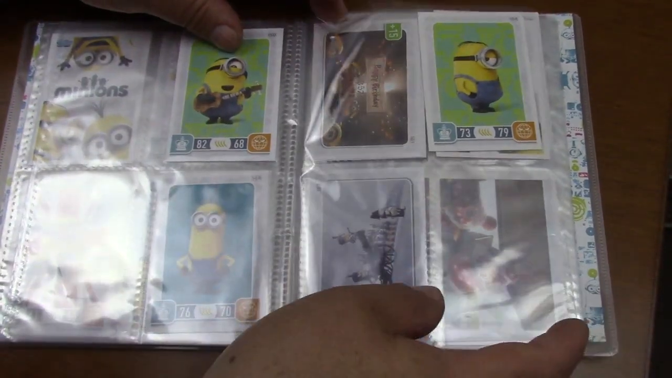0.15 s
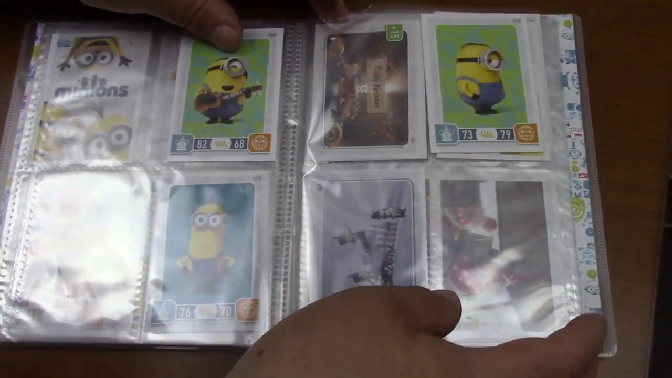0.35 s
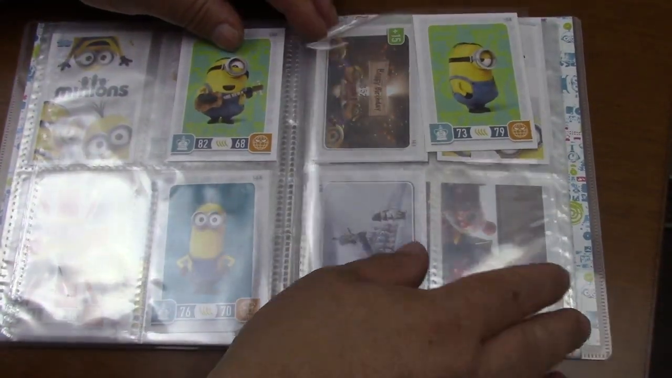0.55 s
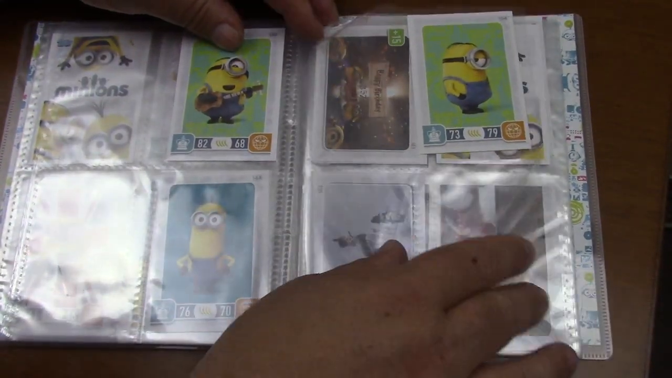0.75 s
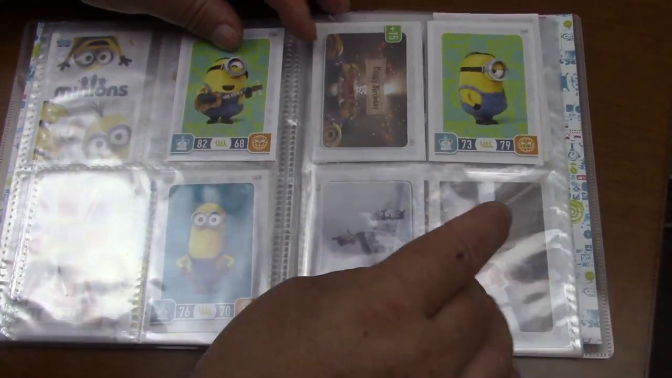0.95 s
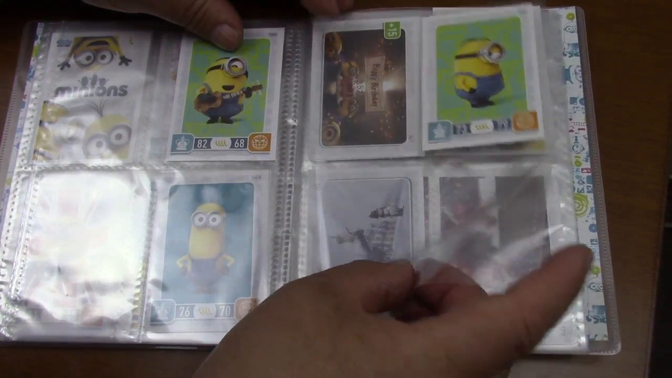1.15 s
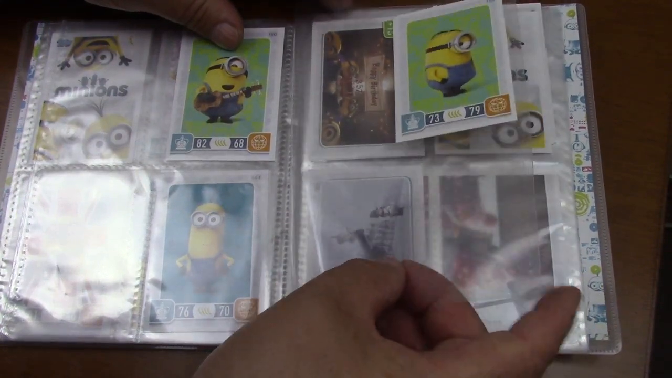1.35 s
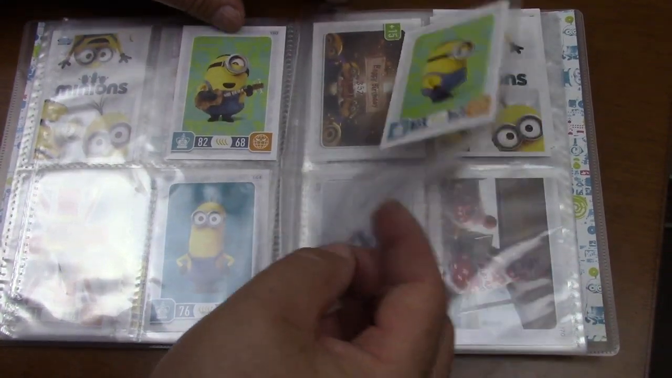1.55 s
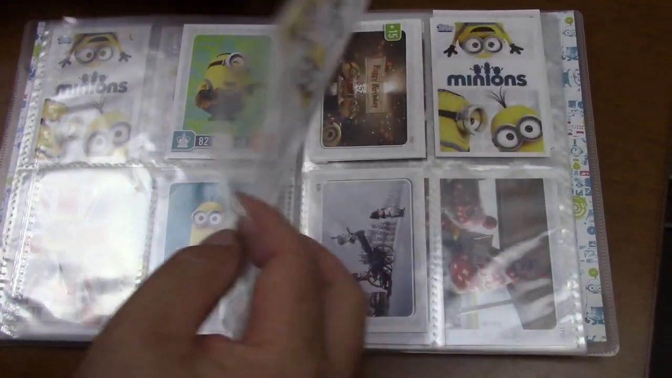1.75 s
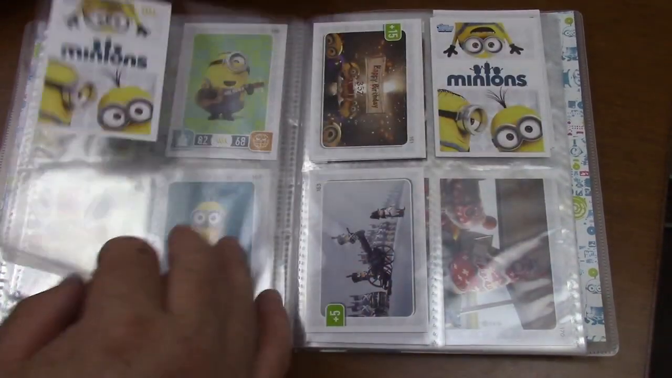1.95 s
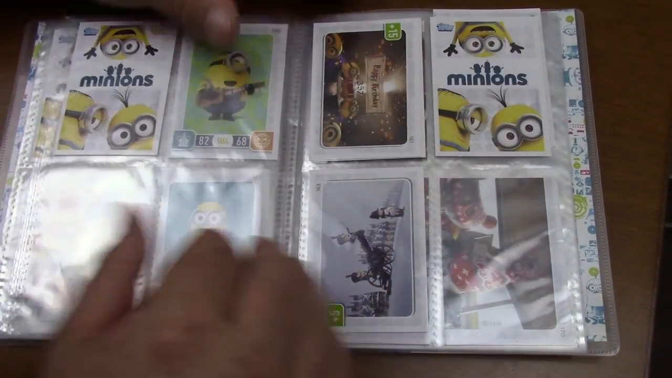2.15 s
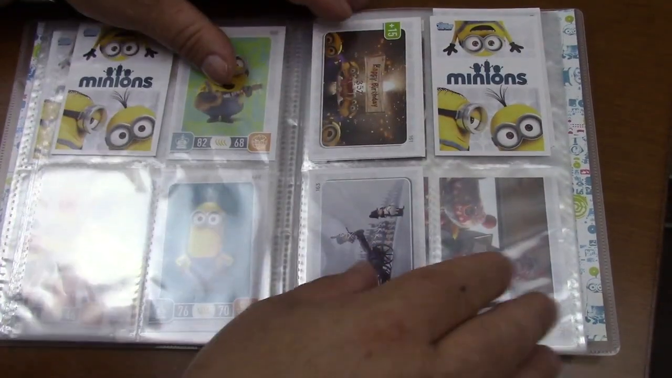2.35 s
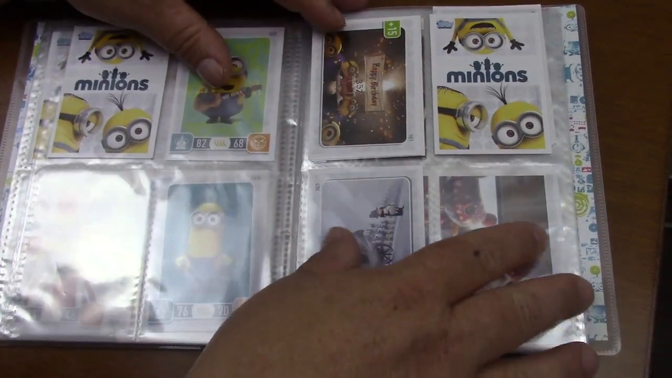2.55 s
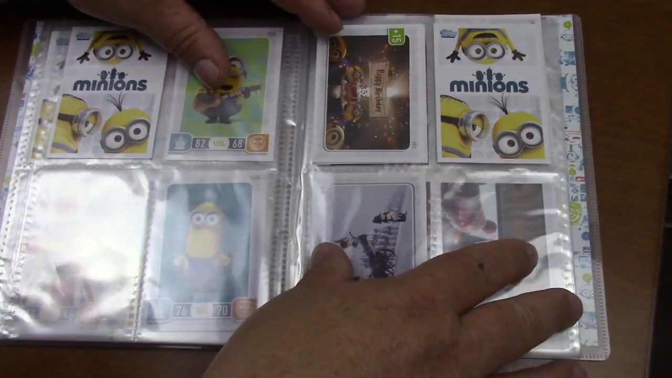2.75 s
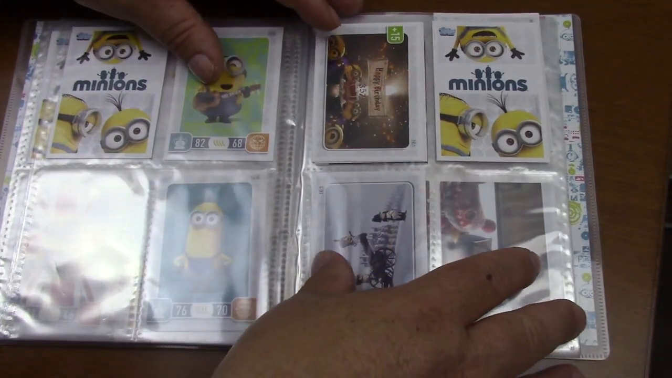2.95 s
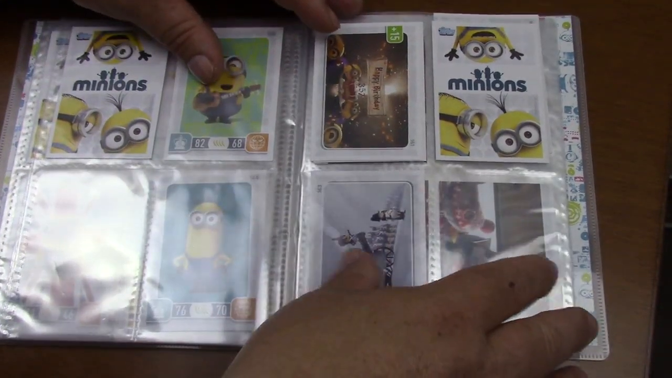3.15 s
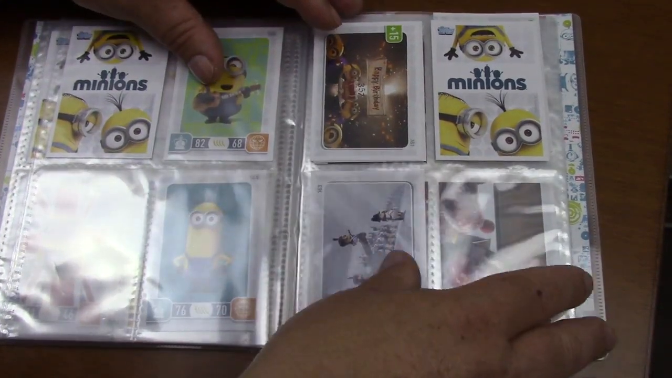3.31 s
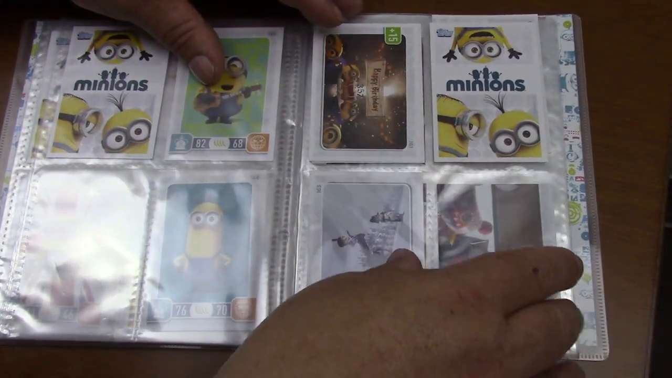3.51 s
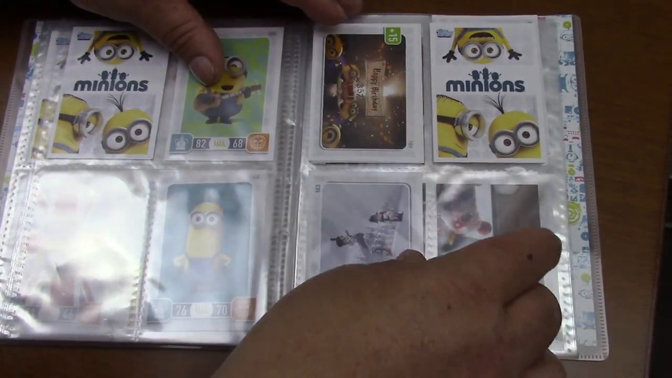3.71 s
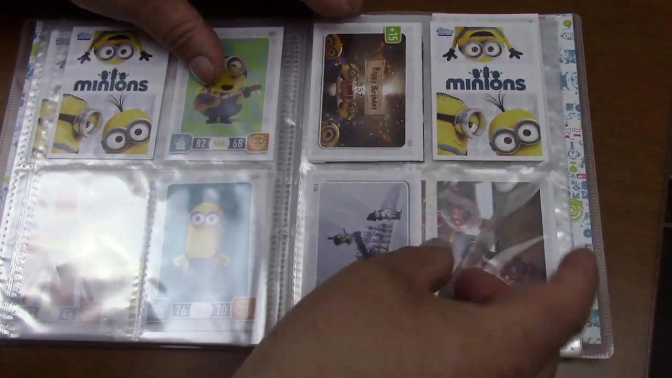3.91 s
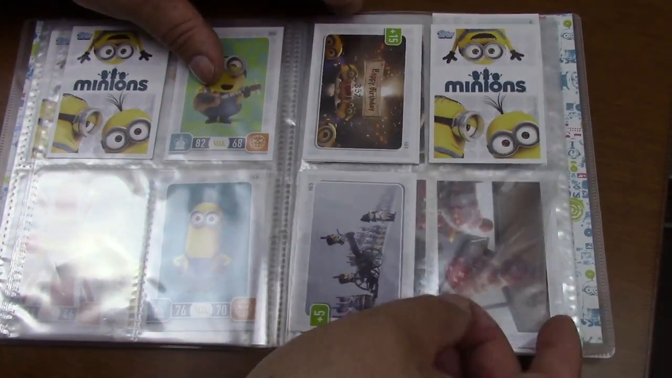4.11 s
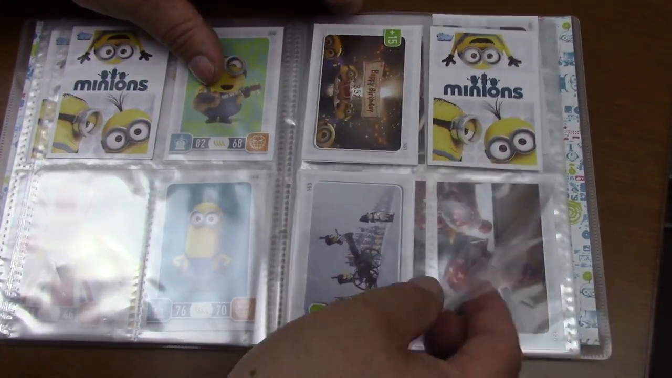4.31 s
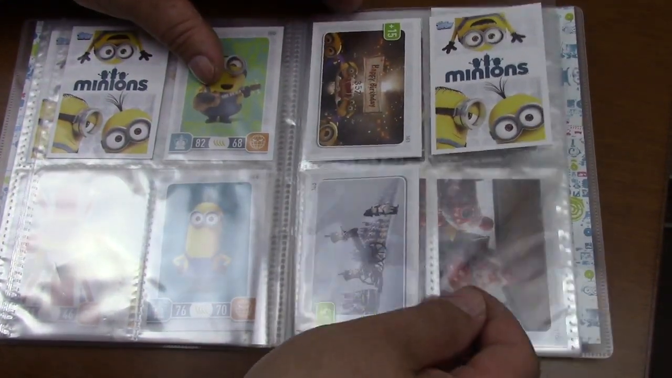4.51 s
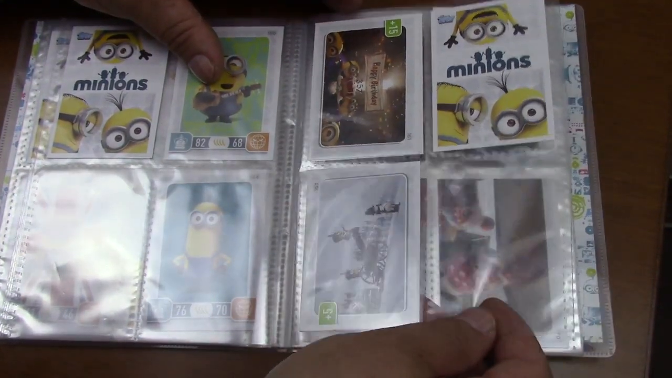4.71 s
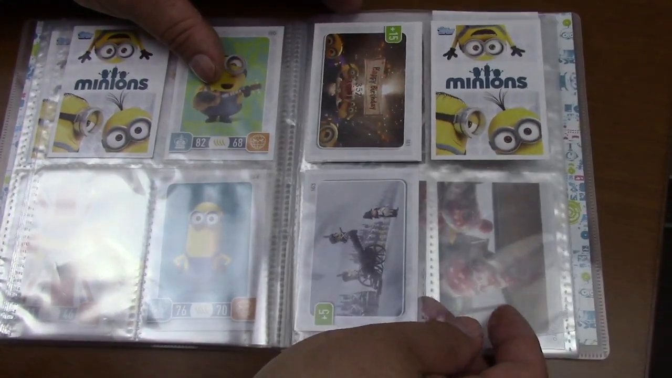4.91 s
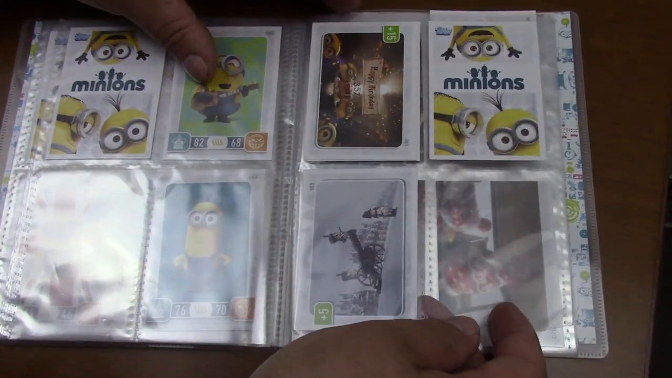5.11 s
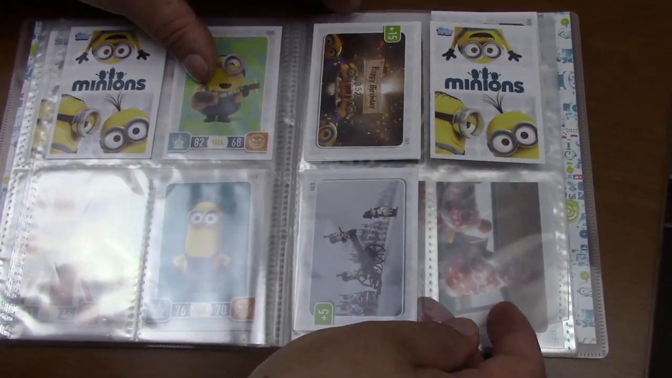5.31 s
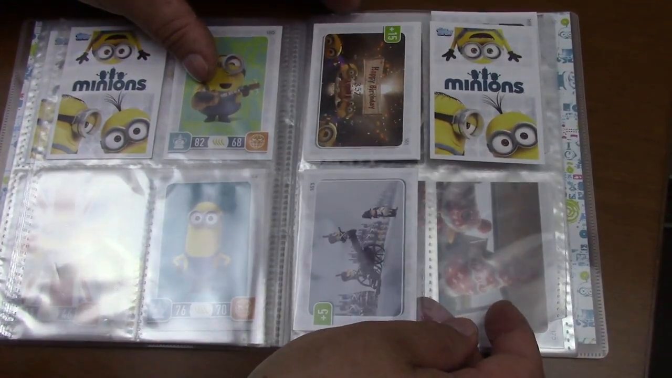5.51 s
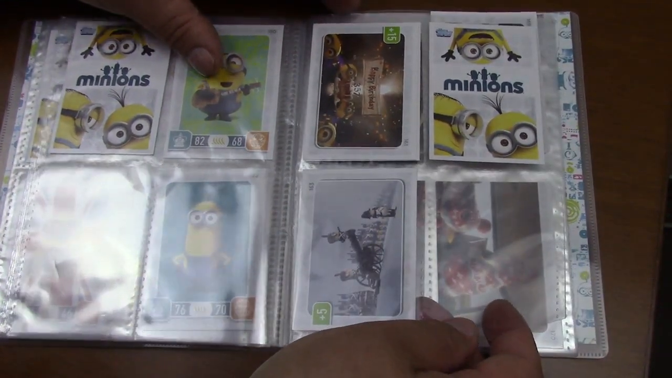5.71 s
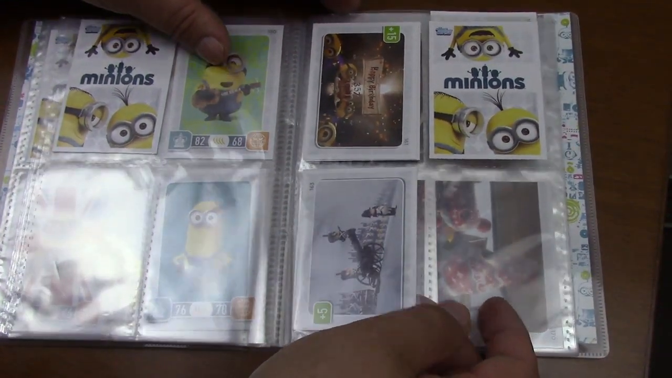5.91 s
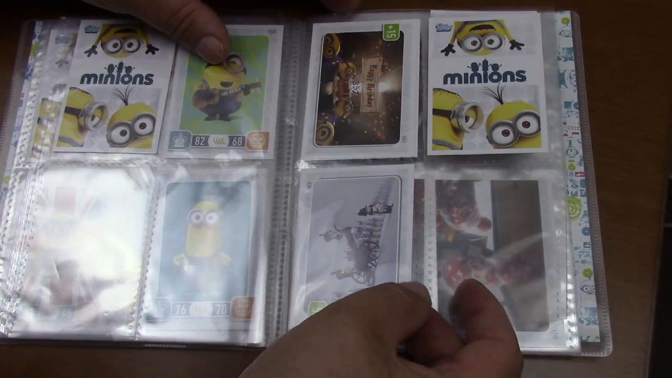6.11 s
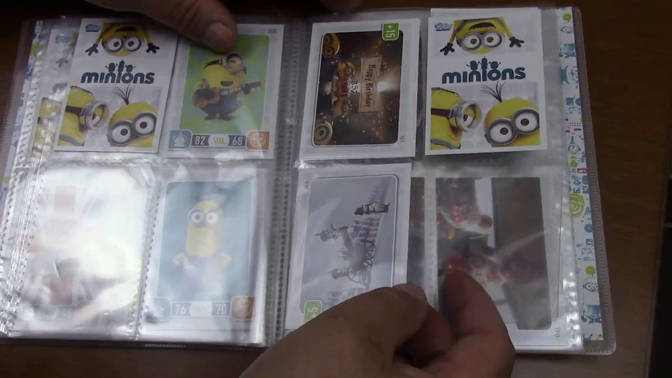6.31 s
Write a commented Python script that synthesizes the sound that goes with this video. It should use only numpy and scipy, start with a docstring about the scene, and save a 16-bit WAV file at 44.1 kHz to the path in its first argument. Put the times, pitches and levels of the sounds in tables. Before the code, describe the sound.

In a small, quiet room, fingers rub and slide over the clear plastic pockets of an album on a table, heard close up. The plastic buckles in short, crisp snaps, loudest near the start and busy while a page is turned. After a sparser stretch comes a second, softer run of rustling and crackling, which dwindles to light touches over faint room noise.

```python
"""Clear plastic pocket pages are turned and pressed on a wooden table in a small, quiet room.
Room air murmurs from the start. Fingers slide and rustle over the film, which buckles in short snaps,
loudest at 0.65 s and dense until 2 s; the walls answer. The handling thins out, picks up from 3.5 s,
then fades to faint strokes after 5.4 s. Heard at two closely spaced microphone ports."""
import sys
import numpy as np
from scipy import signal
from scipy.fft import rfft, irfft, next_fast_len
from scipy.io import wavfile
from scipy.ndimage import map_coordinates

SR = 44100
rng = np.random.default_rng(int(sys.argv[2]) if len(sys.argv) > 2 else 0)


def store_pcm(level_fs):
    """Save levels as 16-bit WAV."""
    pcm = np.round(np.clip(level_fs, -1, 1) * 32767).astype(np.int16)
    wavfile.write(sys.argv[1], SR, np.atleast_2d(pcm).T)


N = 280476

# Room noise spectrum: freq_hz, relative_density_db
AIR_SPECTRUM = [(24, -25), (40, -15), (91, -8.5), (237, -4.5), (337, -1.5), (529, -6), (663, -7),
                (965, -10.5), (1550, -15), (2320, -14), (2910, -18.5), (5720, -21), (7000, -25.5),
                (10000, -27.5), (16000, -34)]
# Narrow room murmurs: centre_hz, width_hz, level_db
AIR_MURMURS = [(131.3, 14, -76), (207, 38, -71)]
# Left-right likeness of the air: freq_hz, correlation
AIR_CORRELATION = [(30, 0.296), (130, 0.79), (640, 0.42), (3000, 0.62), (12000, 1)]
# Room decay: freq_hz, t60_s
WALL_DECAY = [(200, 0.88), (530, 0.62), (1400, 0.28), (3700, 0.26), (9700, 0.32), (16000, 0.34)]
# Part of the tail that differs between the ports: freq_hz, side_gain_db
WALL_SIDE_GAIN = [(250, -20.5), (700, -27), (2500, -25), (8000, -11.5), (15000, -23)]
# Broad resonances of the rubbed film, flex then rustle: centre_hz, width_hz
FILM_RESONANCES = [(1000, 840), (2900, 3000)]
# Surface hiss spectrum: freq_hz, relative_density_db
HISS_SPECTRUM = [(3000, 12), (6000, 6), (10000, 4), (13000, -3.5), (16000, 1)]
# Slow page handling: time_s, rustle_db, hiss_re_rustle_db
SLIDE_LEVELS = [(0.0, -62, 4.5), (0.26, -80, 17.5), (0.49, -60.5, -10), (0.65, -51, -6), (0.8, -48, -13),
                (0.96, -58.5, 4), (1.13, -52.5, 2), (1.5, -72, 0), (1.652, -56, -27), (2.0, -58.5, 11.5),
                (2.12, -49, -5), (2.22, -59, -4), (2.39, -70.5, 3.5), (3.37, -75.5, 5), (3.52, -59.5, -0.5),
                (4.07, -68, 4.5), (4.59, -70.5, 12.5), (5.49, -77, -1), (5.74, -69.5, 5), (6.36, -82, 16)]
# Finger strokes, quick crumples, soft cover bumps: start_s, length_s, level_db, centre_hz, spread_oct
FINGER_STROKES = [(0.145, 0.016, -41.5, 4200, 0.94), (0.429, 0.083, -55.5, 3950, 0.74),
                  (0.467, 0.0041, -50, 5000, 1.3), (0.53, 0.047, -53, 2240, 1.2),
                  (0.731, 0.21, -47, 9000, 0.53), (0.894, 0.01, -34.5, 2880, 0.37),
                  (0.91, 0.13, -53, 3320, 0.97), (0.95, 0.098, -60, 130, 0.17),
                  (1.054, 0.026, -31, 3200, 0.75), (1.08, 0.009, -36, 3000, 1.1),
                  (1.087, 0.045, -54, 3100, 1.1), (1.163, 0.068, -48.5, 3080, 1.04),
                  (1.233, 0.055, -46, 2600, 0.98), (1.285, 0.012, -38, 2630, 0.41),
                  (1.291, 0.0074, -43.5, 10000, 0.33), (1.45, 0.16, -48.5, 2470, 1.07),
                  (1.778, 0.0078, -31, 2420, 0.86), (1.917, 0.19, -52.5, 9000, 0.28),
                  (2.027, 0.011, -21.5, 3040, 0.93), (2.046, 0.0096, -36, 3160, 0.46),
                  (2.05, 0.13, -63, 125, 0.22), (2.25, 0.045, -49, 1070, 0.9),
                  (2.317, 0.045, -59, 9000, 0.88), (2.576, 0.12, -53.5, 1200, 0.98),
                  (2.66, 0.038, -45.5, 1700, 1.55), (3.118, 0.073, -62, 11000, 0.6),
                  (3.146, 0.2, -63, 10500, 0.55), (3.451, 0.054, -56.5, 8000, 0.3),
                  (3.47, 0.018, -48.5, 3670, 0.32), (3.482, 0.026, -52.5, 4100, 0.21),
                  (3.604, 0.0075, -48.5, 3980, 0.26), (3.642, 0.087, -59.5, 8000, 0.65),
                  (3.784, 0.076, -56.5, 3100, 0.95), (3.858, 0.079, -43.5, 6100, 0.88),
                  (3.896, 0.03, -38.5, 400, 0.88), (3.892, 0.0082, -29.5, 10000, 0.1),
                  (4.001, 0.014, -41, 5970, 0.83), (4.082, 0.068, -52, 8400, 0.75),
                  (4.189, 0.062, -55.5, 6700, 0.59), (4.249, 0.036, -44, 6000, 1.2),
                  (4.33, 0.14, -54, 5440, 0.85), (4.494, 0.041, -49.5, 2980, 1.3),
                  (4.67, 0.18, -58.5, 3280, 0.95), (5.177, 0.006, -52, 12500, 0.21),
                  (5.546, 0.15, -62, 2480, 0.56), (5.606, 0.11, -62, 1680, .07),
                  (5.779, 0.046, -56, 6100, .5), (6.062, 0.07, -63, 7300, 0.95)]
# Film buckling: start_s, ring_peak_db, pitch_hz, crackle_re_ring_db, crackle_hz, thud_re_ring_db
BUCKLING_SNAPS = [(0.026, -27.5, 4200, -5.5, 8000, -15.5), (0.107, -50, 1070, 19, 8200, -12),
                  (0.141, -37.5, 880, -4, 6000, -6.5), (0.194, -38.5, 885, 4, 10000, -7),
                  (0.211, -33.5, 1980, 9, 7700, -40), (0.501, -23.5, 3130, -19, 7000, -18),
                  (0.55, -40, 760, -8, 7000, 0.5), (0.596, -28.5, 3400, -25, 6000, -16),
                  (0.621, -23.5, 2750, -11, 6500, -30), (0.651, 0, 2610, -3, 9550, -37),
                  (0.654, -16.5, 2600, 6, 5000, -19), (0.663, -22, 1510, -10, 6000, -12.5),
                  (0.67, -20, 6500, -12, 11000, -40), (0.752, -21, 2900, -5, 6000, -37),
                  (0.897, -24, 2920, -20, 5500, -13), (0.951, -35, 1500, 0, 3500, -30),
                  (0.996, -36.5, 1340, -9, 6000, -26), (1.077, -17.5, 3600, -3, 8000, -20),
                  (1.082, -26, 1190, -6, 4000, -2), (1.259, -33, 1400, -11, 3500, -4.5),
                  (1.408, -32, 1920, -19, 4500, -37), (1.456, -19, 1680, 3, 4200, -17),
                  (1.464, -16.5, 2380, -3, 7700, -13.5), (1.503, -27.5, 1060, -1.5, 6000, -10.5),
                  (1.505, -26, 4000, -6, 6000, -17), (1.626, -30, 1250, -5, 4000, -6.5),
                  (1.648, -22, 3500, -11, 10000, -24), (1.684, -34.5, 1310, 4, 2950, -8),
                  (1.755, -36.5, 900, 3, 3800, -1.5), (1.781, -21, 950, -17, 3500, -11),
                  (1.827, -43, 3500, -22, 6000, -20), (1.855, -35, 1700, -11, 3800, -7),
                  (1.529, -32, 2200, -15, 4000, -22), (1.954, -29, 2900, -18, 5400, -8.5),
                  (1.961, -31, 4500, -8, 7500, -17), (2.018, -30, 3300, -20, 8000, -8),
                  (2.026, -15, 2920, 3.5, 7400, -12), (2.028, -25, 940, -22, 5000, -33),
                  (2.046, -18.5, 3030, -12, 5500, -20), (2.197, -35, 3330, -21, 6000, -25),
                  (2.272, -34, 735, -16, 5000, -13), (2.602, -38.5, 960, -6, 5030, -26),
                  (2.679, -31.5, 820, -15, 6000, -5), (2.8897, -26, 2180, 2, 5260, -32),
                  (2.89, -26.5, 950, -4, 11000, -34), (3.126, -38.5, 900, -7, 4500, -16),
                  (3.16, -44, 950, -20, 4000, -20), (3.569, -31.5, 3100, -5, 5550, -18),
                  (3.593, -35.5, 2870, -14, 4500, -26), (3.677, -29, 2900, -17, 5000, -27),
                  (3.894, -20, 2080, 4.5, 5470, -10), (3.987, -42, 800, 9, 6470, -20),
                  (4.012, -30, 2360, -24, 6000, -22), (4.014, -34, 1080, 11.5, 7500, -24),
                  (4.176, -46.5, 950, 2.5, 3480, -29), (4.278, -32, 3400, -4, 8000, -14),
                  (4.391, -55, 700, -15, 6030, 9), (4.452, -37, 2180, -15, 6000, -8),
                  (4.482, -28, 2670, -1.5, 7500, -29), (4.499, -39, 3000, 2, 12500, -30),
                  (4.513, -32, 1010, 7, 3060, -22), (4.665, -35, 1040, -9, 3500, -21),
                  (4.682, -42, 1000, -15, 3000, -18), (4.771, -36.5, 2200, -10, 8000, -13),
                  (4.779, -38, 2100, -15, 4000, -20), (4.789, -42, 2000, -15, 4000, -22),
                  (4.906, -42, 2270, 0, 11000, -25), (4.939, -33, 990, -28, 2200, -30),
                  (5.032, -40.5, 1700, 0, 4330, -4.5), (5.13, -45, 1000, -2, 12000, -30),
                  (5.187, -43, 3500, 6.5, 12500, -19.5), (5.239, -35, 2920, -6.5, 9000, -11.5),
                  (5.378, -36, 1490, -4.5, 7000, -22), (5.511, -60.5, 716, -21.5, 5000, 20),
                  (6.221, -56, 696, -18, 5000, 8.5)]


def amp(db):
    """dB to gain."""
    return 10 ** (np.asarray(db) / 20)


def unit(x):
    """Scale to rms 1."""
    return x / np.sqrt(np.mean(x ** 2) + 1e-20)


def along(points, hz):
    """Interpolate (freq_hz, value) points on a log axis."""
    freqs_hz, values = np.transpose(points)
    return np.interp(np.log(hz + 1), np.log(freqs_hz + 1), values)


def wobble(rate_hz):
    """Smooth random curve, rate_hz knots a second."""
    knots = rng.standard_normal(int(N * rate_hz / SR) + 4)
    return map_coordinates(knots, [np.arange(N) * rate_hz / SR])


def filtered(x, response):
    """Apply a complex frequency response."""
    n = x.shape[-1]
    n_fft = next_fast_len(n + min(n, SR // 2))
    return irfft(rfft(x, n_fft) * response(np.fft.rfftfreq(n_fft, 1 / SR)), n_fft)[..., :n]


def resonance(f, hz, width_hz):
    """Two identical causal band-passes in series."""
    return (1j * f * width_hz / (hz * hz - f * f + 1j * f * width_hz + 1e-9)) ** 2


def left_right(mid, side):
    return np.array([mid + side, mid - side])


def air(level_db=-61.5):
    """Steady room noise with two low murmurs, partly unlike at the two ports."""
    def mid_side(f):
        angle_rad = np.arccos(np.clip(along(AIR_CORRELATION, f), -1, 1)) / 2
        return np.array([np.cos(angle_rad), np.sin(angle_rad)])

    broad = filtered(rng.standard_normal((2, N)), lambda f: amp(along(AIR_SPECTRUM, f)) * mid_side(f))
    total = amp(level_db + 0.59 * wobble(rate_hz=4.92)) * unit(broad)
    for hz, width_hz, murmur_db in AIR_MURMURS:
        murmur = filtered(rng.standard_normal((2, N)), lambda f: resonance(f, hz, width_hz) * mid_side(f))
        total += amp(murmur_db + 1.5 * wobble(rate_hz=4)) * unit(murmur)
    return left_right(*total)


def walls(x, gain_db=-6.5, build_s=0.0072, delay_samples=120):
    """Reflections thicken into a tail that lasts longest in the bass and dies fastest in the mids, its treble
    kept soft; it differs a little between the ports."""
    hz, t, noise = signal.stft(rng.standard_normal((2, SR // 2)), SR, nperseg=256)
    decay = amp(-60 * t / along(WALL_DECAY, hz)[:, None])
    build = 1.3 - np.exp(-t / build_s)
    tail = signal.istft(noise * decay * build, SR, nperseg=256)[1]
    tail = np.pad(tail / np.linalg.norm(tail[0]), ((0, 0), (delay_samples, 0)))
    mid, side = amp(gain_db) * signal.fftconvolve(x[None], tail, axes=1)[:, :N]
    # The pages radiate little below about 120 Hz, so the tail lacks bass; soft furnishings swallow the treble.
    dull = lambda f: (1j * f / (130 + 1j * f)) ** 2 / (1 + 1j * f / 6000)
    side = filtered(side, lambda f: dull(f) * amp(along(WALL_SIDE_GAIN, f)))
    return left_right(filtered(mid, dull), side)


def ports(x, side_db=-18.5, t60_s=0.00087, delay_samples=45):
    """The microphone housing scatters treble, so each port hears it a little differently."""
    t = np.arange(200) / SR
    scatter = np.diff(rng.standard_normal(len(t)) * amp(-60 * t / t60_s))
    scatter = np.pad(scatter / np.linalg.norm(scatter), (delay_samples, 0))
    return left_right(x, amp(side_db) * np.convolve(x, scatter)[:N])


def stick_slip(spread_db):
    """Dense tiny releases of uneven size, in clumps."""
    clumps_db = 1.8 * wobble(rate_hz=60)
    release_db = spread_db * np.minimum(rng.exponential(size=N), 4.5)
    flicker_db = 1.9 * wobble(rate_hz=250)
    return amp(release_db + clumps_db + flicker_db) * rng.standard_normal(N)


def slide():
    """Skin drags over the film: it rustles, its surface hisses, the page flexes."""
    time_s, *columns = np.transpose(SLIDE_LEVELS)
    rustle_db, hiss_re_db = [np.interp(np.arange(N) / SR, time_s, column) for column in columns]
    flex_db = -60 + 0.51 * (rustle_db + 58.5)
    flex_band, rustle_band = FILM_RESONANCES
    rustle = unit(filtered(stick_slip(spread_db=2.2), lambda f: resonance(f, *rustle_band)))
    hiss = unit(filtered(stick_slip(spread_db=-1.0), lambda f: amp(along(HISS_SPECTRUM, f))))
    flex = unit(filtered(stick_slip(spread_db=3.0), lambda f: resonance(f, *flex_band)))
    return amp(rustle_db) * rustle + amp(rustle_db + hiss_re_db) * hiss + amp(flex_db) * flex


def strokes(abrupt_below_s=0.02, smooth_above_hz=7500):
    """Each stroke swells and fades: a broad hiss, or one narrow resonance of the pocket."""
    out = np.zeros(N + SR)
    gritty, smooth = np.pad([stick_slip(spread_db=2.3), rng.standard_normal(N)], ((0, 0), (0, SR)))
    for start_s, length_s, level_db, centre_hz, spread_oct in FINGER_STROKES:
        start, n = round(start_s * SR), round(length_s * SR)
        friction = (smooth if centre_hz > smooth_above_hz else gritty)[start:start + n]
        band = lambda f: np.exp(-0.25 * (np.log2((f + 1) / centre_hz) / spread_oct) ** 2)
        rub = unit(filtered(friction, lambda f: band(f) / (1 + (f / 14500) ** 4)))
        skew = 0.5 if length_s < abrupt_below_s else 1
        swell = np.sin(np.pi * (np.arange(n) / n) ** skew) ** 0.7
        out[start:start + n] += amp(level_db) * swell * rub
    return out[:N]


def snaps(spray_t60_s=0.017, jolt_re_spray=5.5, creak_samples=36):
    """A crease creaks, then gives in one jolt and a spray of lesser ones; the patch rings and crackles,
    the table thuds. Rows: direct sound; equal-energy feed to the walls, averaged over all directions."""
    out, t = np.zeros((2, N + SR)), np.arange(2048) / SR
    spray_envelope = amp(-60 * t / spray_t60_s)
    spray_envelope[:creak_samples] *= 0.12
    thud = lambda f: resonance(f, hz=429, width_hz=563) + 0.78 * resonance(f, hz=215.5, width_hz=61)
    for start_s, peak_db, pitch_hz, crackle_re_db, crackle_hz, thud_re_db in BUCKLING_SNAPS:
        start = round(start_s * SR)
        ring = lambda f: resonance(f, pitch_hz, 0.75 * pitch_hz) / (1 + 1j * f / (4.1 * pitch_hz)) ** 2
        crackle = lambda f: resonance(f, crackle_hz, 0.76 * crackle_hz)
        for offset_db, body in (0, ring), (crackle_re_db, crackle), (thud_re_db, thud):
            jolts = np.zeros((2, len(t)))
            jolts[0] = rng.standard_normal(len(t)) * spray_envelope
            jolts[:, creak_samples] += jolt_re_spray
            direct, diffuse = filtered(jolts, body)
            gain = amp(peak_db + offset_db) / np.max(np.abs(direct))
            out[:, start:start + len(t)] += gain * np.array([direct, unit(diffuse) * np.std(direct)])
    return out[:, :N]


def scene():
    """Pages near the microphone, in the room."""
    direct, diffuse = snaps()
    rubbing = strokes() + slide()
    return ports(direct + rubbing) + walls(diffuse + rubbing) + air()


def record(dry):
    """Microphone chain: soft peak limit, bass cut, treble roll-off, hard band limit."""
    ceiling, bass_hz, treble_hz, top_hz = 0.95, 40, 15500, 15900
    rounded = dry / (1 + np.abs(dry / ceiling) ** 6) ** (1 / 6)
    high_pass = lambda f: (1j * f / (bass_hz + 1j * f)) ** 2
    low_pass = lambda f: (f < top_hz) / (1 + (f / treble_hz) ** 8)
    return filtered(rounded, lambda f: high_pass(f) * low_pass(f))


dry = scene()
out = record(dry)
store_pcm(out)
```